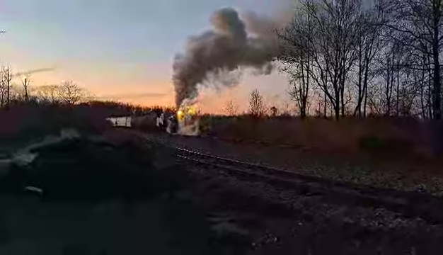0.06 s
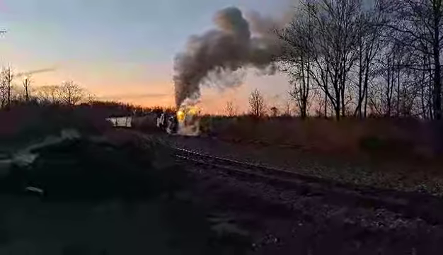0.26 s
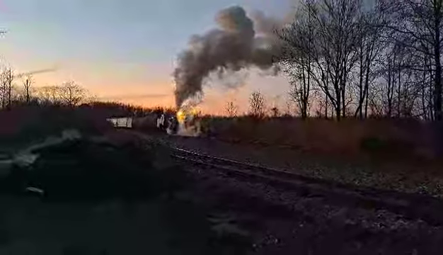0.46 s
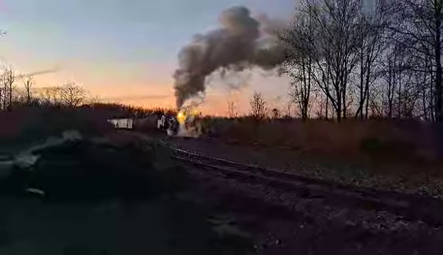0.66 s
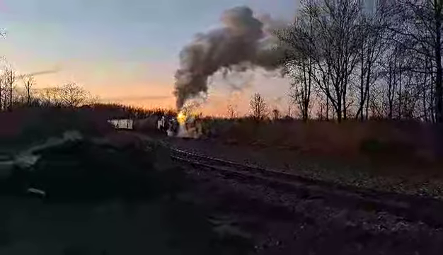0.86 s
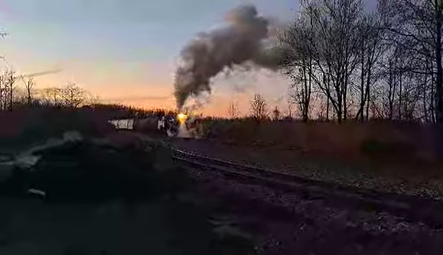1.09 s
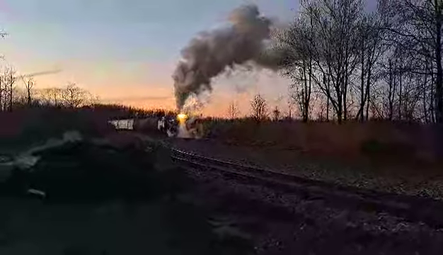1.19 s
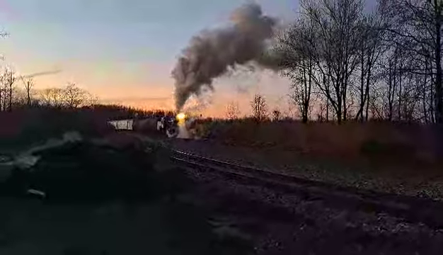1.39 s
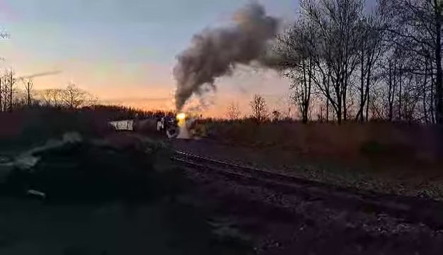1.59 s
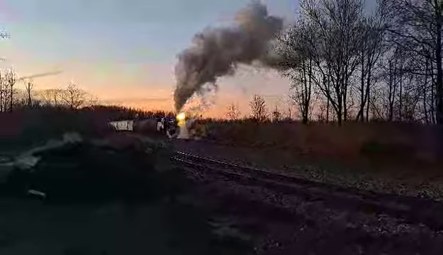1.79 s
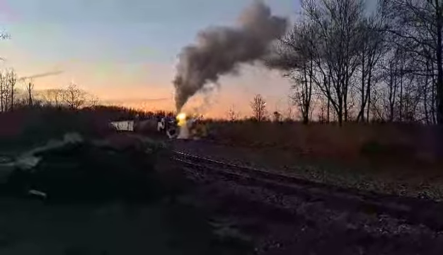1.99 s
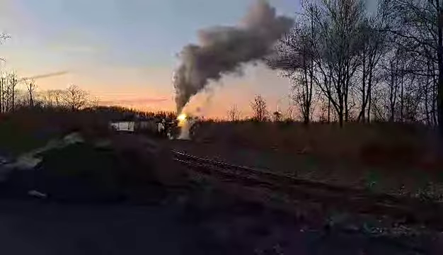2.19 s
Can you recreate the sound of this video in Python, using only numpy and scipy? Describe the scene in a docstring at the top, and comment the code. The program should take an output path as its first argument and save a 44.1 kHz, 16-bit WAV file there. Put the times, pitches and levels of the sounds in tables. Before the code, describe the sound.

A steam locomotive works slowly outdoors: three ragged, booming chuffs about three quarters of a second apart, the first strongest, over low train rumble, wavering chimney hum and constant steam hiss, heard in stereo with slight scatter from trees.

```python
"""A steam locomotive working slowly with freight, heard outdoors on two microphone ports by a line of trees.
Each exhaust beat is turbulent noise coloured by peaks and dips, with a boom at the chimney's lowest resonance
and a diffuse tail of noise from the trees; the draught keeps that resonance humming between the beats.
Behind it the cars rumble with two drones, their wheels roar in narrow bands of noise,
and a steam leak hisses with a fine sizzle and a thin, wavering whistle."""
import sys
import numpy as np
from scipy import signal
from scipy.fft import rfft, irfft
from scipy.io import wavfile

SR = 44100
rng = np.random.default_rng(int(sys.argv[2]) if len(sys.argv) > 2 else 0)


def master(y):
    """Save y as 16-bit WAV."""
    cut = np.clip(np.atleast_2d(y).T, -1, 1)
    pcm = np.round(cut * 32767)  # scale
    wavfile.write(sys.argv[1], SR, pcm.astype(np.int16))


N = 99225
TIME = np.arange(N) / SR  # s
FREQ = np.maximum(np.arange(N // 2 + 1) * SR / N, 1)  # Hz, kept above 0 for the logarithms


def from_db(db):
    """Decibels to gain."""
    return 10 ** (np.asarray(db) / 20)


def rms_one(x):
    """Scale to unit rms."""
    return x / np.sqrt(np.mean(x ** 2) + 1e-20)


def in_time(rows):
    """A control curve at every sample."""
    return np.interp(TIME, *np.transpose(rows))


def in_hz(rows):
    """A spectrum table at every frequency, interpolated over log frequency."""
    hz, value = np.transpose(rows)
    return np.interp(np.log(FREQ), np.log(hz), value)


def pan(db):
    """Left and right gains of constant power; db is left minus right."""
    gains = from_db(np.array([[.5], [-.5]]) * db)
    return gains / np.sqrt(np.mean(gains ** 2, axis=0))


def drift(rate):
    """Random wander of rms 1, mostly slower than rate in Hz."""
    spectrum = rfft(rng.standard_normal(N))
    return rms_one(irfft(spectrum / (1 + (FREQ / rate) ** 4), N))


def noise(colour_db):
    """Coloured stereo noise of rms 1; its treble reaches the left port first."""
    # Likeness of the two sides: (frequency [Hz], correlation before the phase lead [0 to 1])
    likeness = [(50, 1), (130, 1), (280, 0.95), (600, 0.8), (1300, 0.83), (3000, 0.73), (6000, 0.3),
                (12000, 0.097)]
    # The two microphone ports: (frequency [Hz], phase by which the left leads [rad])
    port_phase = [(760, 0), (1020, 1.46), (1125, 3.5), (1300, 6.5), (1500, 7.5), (1780, 10.5), (2300, 14),
                  (2950, 15.5), (3300, 16), (4250, 17.5), (4680, 23), (5000, 25.5), (13000, 48)]
    # How the two sides hear the train: (frequency [Hz], left minus right [dB])
    balance = [(350, -1), (520, 0.5), (670, 2), (800, -13), (1000, 1), (1420, -3.5), (1650, -7),
               (2800, -12.5), (3230, -2), (3480, -16.5), (4600, -1.5), (7700, -3), (10000, 5.5)]
    mid, side = rfft(rng.standard_normal((2, N)))
    alike = np.clip(in_hz(likeness), 0, .999)
    both = np.sqrt(1 + alike) * mid + np.sqrt(1 - alike) * side * [[1], [-1]]
    both[1] *= np.exp(-1j * in_hz(port_phase))  # the right side lags
    return rms_one(irfft(both * from_db(colour_db) * pan(in_hz(balance)), N))


def tone(hz, wander_hz, rate, flutter_db, octave_db=-80):
    """A flow-driven resonance: a sine and its octave, unsteady in pitch and level."""
    cycles = np.cumsum(hz + wander_hz * drift(rate)) / SR + rng.random()
    phase = 2 * np.pi * cycles
    wave = np.sin(phase) + from_db(octave_db) * np.sin(2 * phase)
    return rms_one(wave * from_db(flutter_db * drift(rate)))


def puff(start, length, attack, release):
    """A smooth opening; once length has passed since the start, the pressure dies away exponentially."""
    age = TIME - start
    opening = np.sin(np.pi / 2 * np.clip(age / attack, 0, 1)) ** 2
    return opening * np.exp(-np.maximum(age - length, 0) / release)


def ragged(x):
    """Eddies of every size: each octave band surges on its own, and all flutter together."""
    eddy_db, turbulence_db = 1.7, 0.93
    spectrum, out = rfft(x), 0
    for hz in 2. ** np.arange(5, 15):
        # Overlapping triangles on an octave scale
        share = np.maximum(1 - np.abs(np.log2(FREQ / hz)), 0)
        out = out + irfft(spectrum * share, N) * from_db(eddy_db * drift(84))
    return rms_one(out * from_db(turbulence_db * drift(190)))


def rumble():
    """The cars' low rumble: bass-heavy noise with two unsteady drones."""
    # Rumble spectrum: (frequency [Hz], relative density [dB per Hz])
    rumble_colour = [(20, -34), (48, -2.5), (72, 10.5), (88, 2), (135, 12.5), (215, -2.5), (280, 5.5),
                     (400, -5), (700, -41.5)]
    # Rumble level: (time [s], level [dB])
    rumble_level = [(0, -38), (.3, -33), (2.25, -33)]
    # Low drones of the train: (frequency [Hz], level relative to the rumble noise [dB])
    drone_rows = [(51, -7), (71, -10)]
    drones = 0
    for hz, db in drone_rows:
        drones = drones + from_db(db) * tone(hz, wander_hz=4.1, rate=8.1, flutter_db=1)
    return from_db(in_time(rumble_level)) * (noise(in_hz(rumble_colour)) + drones)


def wheel_roar():
    """Rolling wheels and rails: noise in resonant bands that each swell and fade on their own."""
    # Wheel and rail resonances: (centre [Hz], half-width at -6 dB [Hz], relative level [dB])
    wheels = [(479, 82, -3.5), (559, 54, 0), (620.5, 40, -2), (677, 106, -6), (766, 63, -2.5),
              (792, 125, -3.5)]
    # Roar level: (time [s], level [dB])
    rolling_level = [(0, -43.5), (.55, -43), (.82, -35.5), (.92, -36.5), (1.15, -35.5), (1.42, -33.5),
                     (1.62, -38.5), (1.97, -35), (2.25, -42)]
    swell_db = 2.8
    roar = 0
    for hz, width, db in wheels:
        band = noise(-20 * np.log10(1 + ((FREQ - hz) / width) ** 2))
        roar = roar + from_db(db + swell_db * drift(9.3)) * band
    return from_db(in_time(rolling_level)) * rms_one(roar)


def leak():
    """Escaping steam: turbulent hiss, a fine sizzle on top and a faint, unsteady whistle."""
    # Hiss spectrum: (frequency [Hz], relative density [dB per Hz])
    hiss_colour = [(500, -8), (1100, 6), (1330, 4), (1600, 3), (2100, 3.5), (2750, 4.5), (3200, 1),
                   (3700, 0), (4400, -3.5), (5000, -5), (5600, -16), (7700, -21.5), (9000, -46),
                   (13000, -64)]
    # Hiss level: (time [s], level [dB])
    hiss_level = [(0, -41), (.15, -41.5), (.45, -39), (.85, -39.5), (1.35, -40), (1.65, -41), (2.0, -39),
                  (2.25, -40.5)]
    # The finest spray: (frequency [Hz], relative density [dB per Hz])
    sizzle_colour = [(3000, -25), (5000, 14), (5800, 8.5), (7700, 10), (9000, -4), (13000, 2)]
    # Sizzle level: (time [s], level [dB])
    sizzle_level = [(0, -52), (.45, -54.5), (.72, -65), (.9, -64.5), (1.35, -56), (1.95, -55), (2.25, -56)]
    # Whistle level: (time [s], level [dB])
    whistle_level = [(0, -50.5), (.45, -51), (.75, -57.5), (1.6, -59), (2.25, -53.5)]
    hiss = from_db(in_time(hiss_level) + 0.56 * drift(38)) * noise(in_hz(hiss_colour))
    sizzle = from_db(in_time(sizzle_level) + drift(25)) * noise(in_hz(sizzle_colour))
    whistle = tone(hz=3731, wander_hz=3.8, rate=30, flutter_db=2.0, octave_db=-17.5)
    return hiss + sizzle + from_db(in_time(whistle_level)) * whistle * pan(db=-3.5)


def draught():
    """The chimney's air column booms with the beats and hums on between them."""
    # Hum level: (time [s], level [dB])
    hum_level = [(0, -33.5), (.12, -34), (.18, -51), (.33, -28), (.375, -25.5), (.53, -25.5), (.60, -40),
                 (.69, -34), (.75, -22.5), (.84, -23), (.91, -33.5), (1.0, -27), (1.15, -34), (1.2, -17.5),
                 (1.32, -26), (1.39, -20.5), (1.48, -27), (1.6, -29), (1.68, -26), (1.71, -32), (1.89, -28),
                 (1.93, -19.5), (1.99, -21.5), (2.04, -45.5), (2.25, -33.5)]
    # Pitch of the air column: (time [s], frequency [Hz])
    hum_pitch = [(0, 145.1), (.3, 137.9), (.55, 142.1), (.9, 139), (1.01, 149.6), (1.1, 138.8), (1.25, 146),
                 (1.95, 145.4)]
    # Surges during the beats: (start [s], time from start to release [s], level when fully open [dB])
    boom_rows = [(0.216, 0.0517, -16.5), (0.29, 0.063, -16.5), (0.972, 0.082, -15.5), (1.084, 0.029, -9.5),
                 (1.759, 0.11, -16)]
    booms = 0
    for start, length, db in boom_rows:
        booms = booms + from_db(db) * puff(start, length, attack=0.035, release=.01)
    column = tone(in_time(hum_pitch), wander_hz=6.23, rate=40.6, flutter_db=1.8, octave_db=-25.5)
    return (from_db(in_time(hum_level)) + booms) * column


def trees(x):
    """Diffuse scatter from the trunks: a delayed burst of dying noise convolved with the sound."""
    level_db, t60_s, delay_s = -14.5, 0.51, 0.042
    age = np.maximum(TIME - delay_s, 0)
    scatter = rng.standard_normal((2, N)) * (age > 0) * from_db(-60 * age / t60_s)
    above_bass = signal.sosfilt(signal.butter(2, 400, "high", fs=SR, output="sos"), x)
    tail = signal.fftconvolve(above_bass, rms_one(scatter) / np.sqrt(N), axes=1)[:, :N]
    return from_db(level_db) * tail


def exhaust():
    """Each beat: a ragged rush of steam, its noise shaped by peaks and dips, with a tail from the trees."""
    # Beats: (start [s], time from start to release [s], rush level [dB], tilt above 600 Hz [dB per octave])
    chuffs = [(0.183, .14, -18, 1.17), (0.926, 0.14, -21.5, 0.2), (1.709, 0.14, -21, -0.25)]
    # The rush of steam: (frequency [Hz], relative density [dB per Hz])
    rush_colour = [(40, 2.5), (100, 1.5), (175, 18), (220, -2), (370, -7.5), (600, 2.5), (900, -3),
                   (1500, -4), (2700, -4), (4500, -18), (6000, -29), (9000, -40), (13000, -46.5)]
    # Peaks and dips in the colour of the exhaust rush: (centre [Hz], width [Hz], boost or cut [dB])
    peaks_and_dips = [(270, 42, 12), (615, 110, 5), (760, 39, 5.5), (1120, 53, -1.5), (1296, 86, 9),
                      (1753, 34, 10), (2170, 230, -9.5), (2330, 140, 4.5), (3185, 210, -11.5)]
    colour = in_hz(rush_colour)
    for hz, width, db in peaks_and_dips:
        colour = colour + db / (1 + (2 * (FREQ - hz) / width) ** 2)
    octaves = np.log2(np.maximum(FREQ / 600, 1))
    rush = 0
    for start, length, db, tilt_db in chuffs:
        steam = ragged(noise(colour + tilt_db * octaves))
        rush = rush + steam * from_db(db) * puff(start, length, attack=0.1, release=0.051)
    return rush + trees(rush)


def scene():
    """The cars and the leak behind, the humming chimney and the exhaust beats in front."""
    return rumble() + wheel_roar() + leak() + draught() * pan(db=0.3) + exhaust()


def record(dry):
    """The ends are eased over 4 ms, and the top is cut steeply above 13.1 kHz."""
    edges = np.clip(np.minimum(TIME, TIME[-1] - TIME) / .004, 0, 1)
    low_pass = signal.ellip(12, .1, 90, 13100, fs=SR, output="sos")
    return signal.sosfilt(low_pass, dry * edges)


dry = scene()
out = record(dry)
master(out)
```